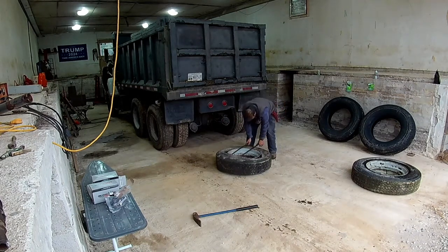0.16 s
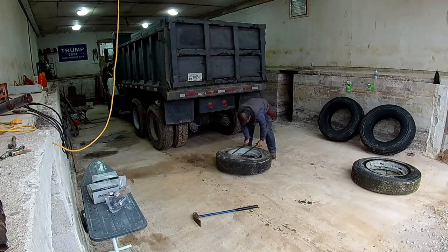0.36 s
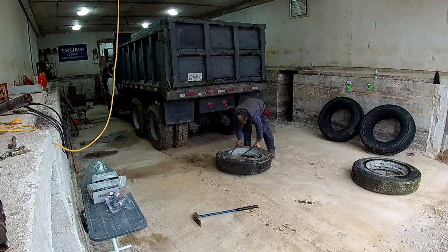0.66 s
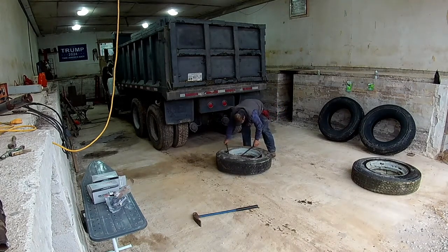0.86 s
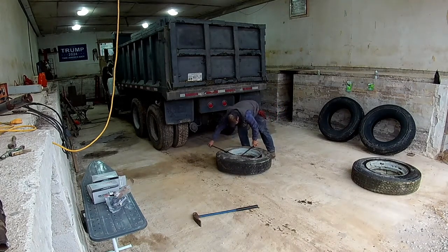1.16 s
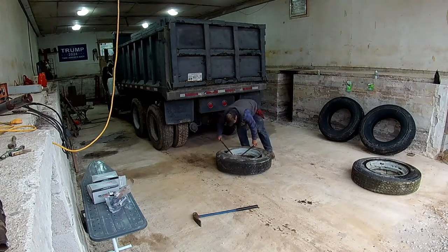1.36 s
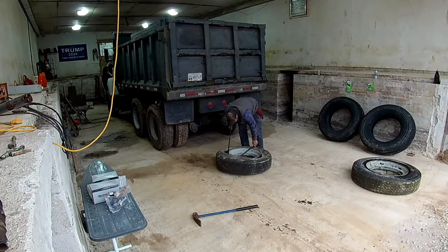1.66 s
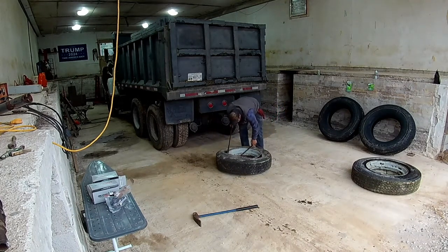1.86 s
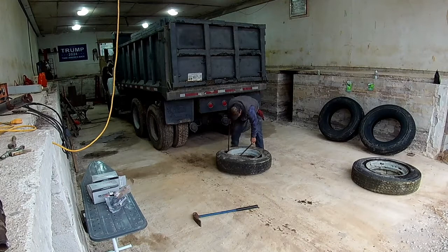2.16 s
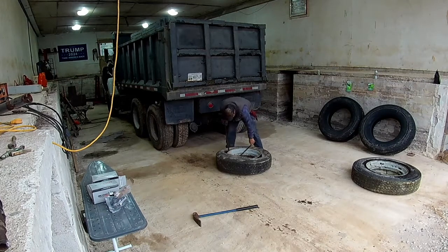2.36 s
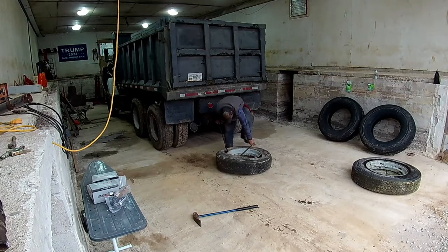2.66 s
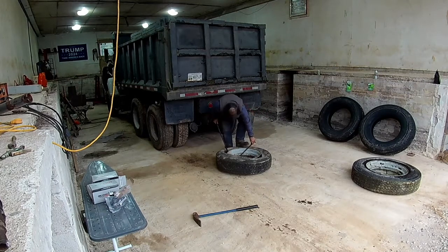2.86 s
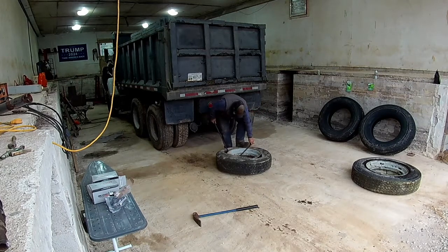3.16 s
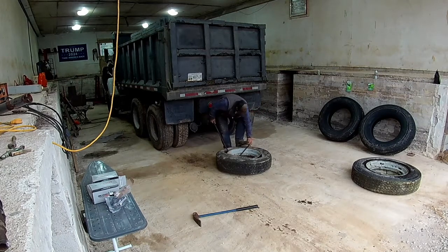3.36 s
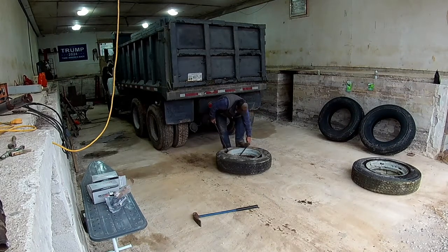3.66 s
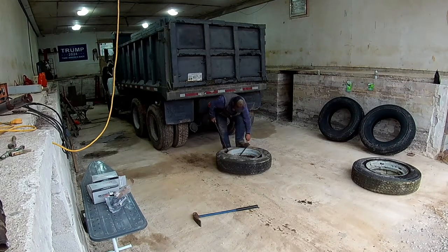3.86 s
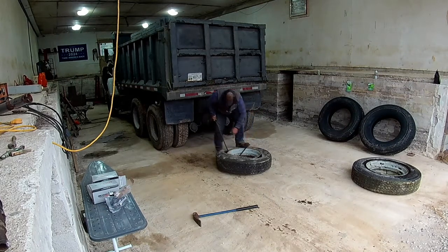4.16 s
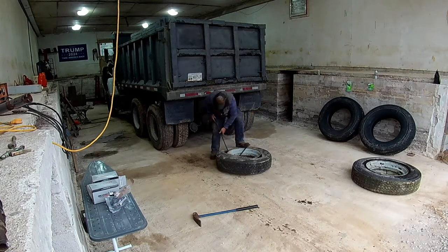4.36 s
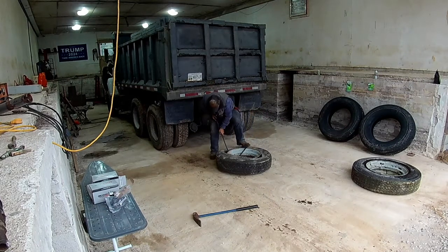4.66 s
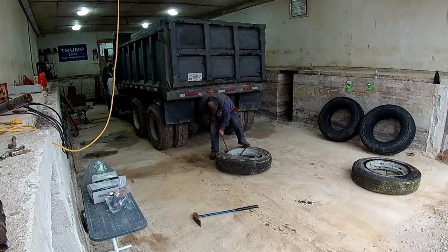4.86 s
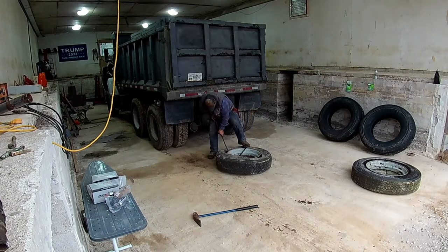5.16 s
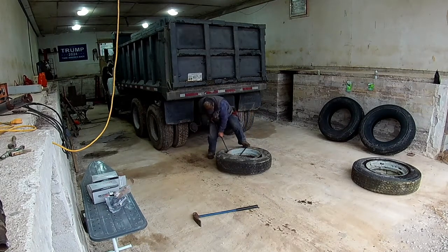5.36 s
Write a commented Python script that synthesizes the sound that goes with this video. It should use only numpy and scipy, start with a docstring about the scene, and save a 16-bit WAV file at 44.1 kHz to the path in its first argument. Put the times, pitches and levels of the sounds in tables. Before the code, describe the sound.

Iron bars pry at a heavy truck tire on a steel wheel, with dull thuds, scrapes and hard ringing clanks echoing in a concrete bay.

```python
"""Steel tire irons lever a truck tire over its wheel rim, a few metres away in a concrete workshop bay.
Dull tire thuds open; a scrape leads to a hard clank, and twice the tip snaps off the edge and rings the rim.
Rubbing and brief rings of the hand-held iron follow, then a clank as a low hum swells and sinks again.
A last scrape ends in a clank, a booming thud and a third snap. Struck modes make the ringing, random
stick-slip clicks the scraping; the bay echoes the blows, and filtered noise rumbles steadily below."""
import sys
import numpy as np
from scipy import signal
from scipy.fft import rfft, irfft
from scipy.io import wavfile
from scipy.ndimage import uniform_filter1d

SR = 44100
rng = np.random.default_rng(int(sys.argv[2]) if len(sys.argv) > 2 else 0)


def wav_record(signal):
    """Record a signal, one row per channel, as 16-bit PCM in the file named by sys.argv[1]."""
    frames = np.transpose(np.atleast_2d(signal))
    bounded = np.clip(frames, -1, 1)
    # unit amplitude maps onto the largest positive 16-bit level
    quanta = np.round(bounded * 32767).astype(np.int16)
    wavfile.write(sys.argv[1], SR, quanta)


N = 243873
TIME = np.arange(N) / SR
SECOND = TIME[:SR]

# iron knocks on the wheel: start_s, clatter_db, contact_cutoff_hz, grit_db, touches (count),
# rebound_db (change per touch), wheel_ring_db, place struck (0-2)
KNOCK_EVENTS = [(0.167, -14.5, 833, -38.5, 2, -0.5, -22, 1), (0.664, -3, 2700, -35.5, 4, -1.5, 0, 0),
                (1.054, -19.5, 1300, -33, 1, 3, -14, 0), (1.260, -19, 1440, -45, 2, 2, -14.5, 1),
                (1.545, -13, 1580, -25.5, 2, 2.5, 1.5, 2), (3.578, -6.5, 1580, -43, 2, 1, 1, 1),
                (4.313, -23.5, 1300, -42, 2, -10, -20, 1), (5.335, -5, 920, -25.5, 2, -4, -18.5, 1)]
# colour of a hard iron blow: frequency_hz, relative_level_db (per Hz)
CRACK_SPECTRUM = [(150, -19), (280, -6.5), (380, -2), (540, 1), (700, -2), (1050, 6), (1500, -3.5),
                  (2150, -3), (2900, -14.5), (3850, -12.5), (5000, -56.5), (7000, -48.5), (15000, -53)]
# colour of iron grating on steel: frequency_hz, relative_level_db (per Hz)
GRIT_SPECTRUM = [(900, -8), (1400, 10.5), (2000, 0), (2800, -2), (3600, -3), (4600, -7), (5500, -16),
                 (6500, -25), (9000, -34.5), (15000, -53.5)]


def from_db(db):
    """Decibels to gain."""
    return 10 ** (np.asarray(db) / 20)


def unit(x):
    """Scale to an energy of one."""
    return x / np.sqrt(np.sum(x ** 2) + 1e-20)


def at_hz(points, hz):
    """Read a table along log frequency."""
    f, value = np.transpose(points)
    return np.interp(np.log(np.maximum(hz, 1)), np.log(f), value)


def add(out, s, sound):
    """Mix a sound in at a given time."""
    i = int(np.clip(round(s * SR), 0, N - 1))
    out[i:i + len(sound)] += sound[:N - i]


def through(x, response):
    """Pass a sound through an impulse response."""
    return signal.fftconvolve(x, response)[:N]


def pulse(spectrum, size=8192):
    """The most compact causal pulse with this spectrum (minimum phase); energy one."""
    gain = from_db(at_hz(spectrum, np.fft.rfftfreq(size, 1 / SR)))
    cepstrum = irfft(np.log(gain))
    # folding the cepstrum forward in time gives the minimum phase
    cepstrum[1:size // 2] *= 2
    cepstrum[size // 2 + 1:] = 0
    return unit(irfft(np.exp(rfft(cepstrum))))


def fade(t60):
    """One second of exponential decay that falls 60 dB in t60 seconds."""
    return np.exp(-np.log(1000) * SECOND / max(t60, 1e-3))


def ring(modes):
    """Struck modes, each dying at its own rate."""
    out = np.zeros(SR)
    for hz, db, t60 in modes:
        tone = unit(np.sin(2 * np.pi * hz * SECOND) * fade(t60))
        out += from_db(db) * rng.choice([-1, 1]) * tone
    return out


def slips(per_s, spread_db):
    """Stick-slip: random clicks of uneven size; rms one."""
    sizes = from_db(spread_db * np.minimum(rng.exponential(1, N), 4)) * rng.choice([-1, 1], N)
    clicks = sizes * (rng.random(N) < per_s / SR)
    return unit(clicks) * np.sqrt(N)


def knocks(hiss_db, slip_t60):
    """The iron clatters on the wheel, duller on each rebound, and the slipping tip grates."""
    first_gap_s, gap_stretch = .014, 1.4  # each further gap is longer by the stretch
    dulling = 0.72  # factor per touch on the contact cut-off, and on the grating's level
    clatter, hiss = np.zeros(N), np.zeros(N)
    crack, grit = pulse(CRACK_SPECTRUM), pulse(GRIT_SPECTRUM)
    for s, db, contact_hz, grit_db, touches, rebound_db, _, _ in KNOCK_EVENTS:
        for k in range(touches):
            force = from_db(rebound_db * k)
            contact = signal.butter(2, contact_hz * dulling ** k, fs=SR, output="sos")
            add(clatter, s, force * from_db(db) * signal.sosfilt(contact, crack))

            dying_slips = slips(per_s=2500, spread_db=4)[:SR] * fade(slip_t60)
            grating = unit(through(dying_slips, grit))
            add(clatter, s, force * dulling ** k * from_db(grit_db) * grating)

            # very faint short hiss added to each knock
            short_noise = unit(rng.standard_normal(SR) * (fade(.25) - fade(.04)))
            add(hiss, s, force * from_db(db + hiss_db) * short_noise)
            s += first_gap_s * gap_stretch ** k
    return clatter, hiss


def steel(blows, modes, waver, first_swell, size=36):
    """Ringing steel: the place struck decides which modes speak; overlapping echoes make each tone waver."""
    # decay of the ring heard in the bay: frequency_hz, t60_s
    steel_t60 = [(300, .8), (1100, .85), (2400, .8), (5000, .68), (6000, .7), (7000, .52), (9400, .25)]
    out = np.zeros(N)
    for s, db, place in blows:
        for hz, *place_db in modes:
            drift = rng.standard_normal(size) + 1j * rng.standard_normal(size)
            echoes = np.interp(SECOND * (size - 1), np.arange(size), drift)
            carrier = np.exp(2j * np.pi * (hz * SECOND + rng.random()))
            tone = np.real((1 + waver * echoes) * carrier)
            # the tire soon damps the steel, and the bay carries the tone on
            decay = fade(at_hz(steel_t60, hz)) + first_swell * fade(.3)
            onset = 1 - fade(.008)
            add(out, s, from_db(db + place_db[place]) * unit(tone * decay * onset))
    return out


def wheel_ring():
    """Every knock sets the wheel's modes ringing."""
    # wheel modes: frequency_hz, then level_db when struck at place 0, 1, 2
    wheel_modes = [(306, -18, -21, -15), (457, -17, -34, -17), (559, -23, -13, -33), (579, -13, -21, -24),
                   (703, -19, -20, -41), (750, -33, -15, -23), (775, -24, -18, -31), (885, -34, -16, -40),
                   (942, -13, -33, -28), (962, -16, -18, -30), (976, -6, -33, -23), (1007, -25, -21, -16),
                   (1022, -14, -19, -17), (1052, -24, -36, -16), (1071, -16, -38, -21),
                   (1100, -24, -14, -36), (1125, -10, -24, -33), (1150, -9, -27, -36),
                   (1178, -13, -26, -23), (1305, -25, -41, -20), (1394, -15, -34, -36),
                   (1444, -18, -23, -38), (1497, -39, -45, -22), (1602, -19, -32, -49),
                   (1641, -15, -28, -46), (1678, -35, -20, -31), (1773, -20, -27, -25),
                   (2054, -16, -40, -32), (2130, -18, -28, -36), (2213, -23, -30, -40)]
    blows = [(s, ring_db, place) for s, *_, ring_db, place in KNOCK_EVENTS]
    return steel(blows, wheel_modes, waver=0.86, first_swell=0.99)


def rim_snaps():
    """The tip snaps off the rim's free edge and rings its higher modes."""
    # snaps: start_s, level_db, place on the edge (0-2)
    snap_events = [(1.063, 0, 0), (1.552, 2, 1), (5.34, 0.5, 2)]
    # modes of the free edge: frequency_hz, then level_db when struck at place 0, 1, 2
    rim_modes = [(2375, -27, -29, -44), (2595, -50, -29, -46), (2666, -60, -29, -50), (2734, -39, -42, -39),
                 (2875, -50, -30, -48), (3114, -52, -32, -50), (3359, -66, -32, -48), (3439, -46, -32, -39),
                 (3616, -41, -41, -35), (3958, -25, -35, -44), (4077, -41, -39, -50), (4239, -67, -32, -44),
                 (4410, -70, -35, -40), (4674, -46, -39, -40), (4719, -59, -34, -46),
                 (4886, -25.5, -34, -56), (5176, -58, -36, -60), (5530, -44, -50, -47),
                 (5715, -42, -43, -52), (5893, -60, -35, -65), (5938, -70, -38, -65), (7012, -40, -42, -62),
                 (7606, -70, -52, -65), (9400, -56, -58, -70)]
    return steel(snap_events, rim_modes, waver=.9, first_swell=1.8)


def tire():
    """The rubber gives a dull slap, and the carcass booms on in the modes nearest the pitch of the push."""
    # thuds: start_s, slap_db, boom_db, push_hz
    thuds = [(0.073, -18, -23, 156), (0.101, -20.5, -15, 102), (0.168, -6, -24, 135),
             (0.189, -13, -4, 122.4), (0.667, -7.5, -6, 133), (1.0, -14, -23, 110),
             (1.042, -10, -6.5, 121.5), (1.547, -3.5, -5.5, 142), (1.583, -13, -2.5, 191),
             (2.284, -23, -24, 108), (2.749, -23, -14.5, 99), (2.886, -21.5, -18, 150),
             (3.584, -14.5, -8, 143.5), (4.307, -16, -32, 183), (5.333, -8, 2.5, 106)]
    # carcass modes: frequency_hz, t60_s
    carcass = [(102, .45), (135, .5), (176, .42)]
    # colour of the rubber slap: frequency_hz, relative_level_db (per Hz)
    rubber = [(30, -32.5), (60, -4), (90, 0.5), (125, 1), (185, 4), (240, -1), (310, 0), (380, -10),
              (490, -7), (900, -26), (3000, -67.5)]
    fall_db_per_octave = 25  # modes answer less the further they lie from the push
    slap, boom, push = np.zeros(N), np.zeros(N), pulse(rubber)
    for s, slap_db, boom_db, push_hz in thuds:
        add(slap, s, from_db(slap_db) * push)
        for hz, t60 in carcass:
            db = boom_db - fall_db_per_octave * abs(np.log2(hz / push_hz))
            envelope = fade(t60) - fade(0.016)  # soft onset
            add(boom, s, from_db(db) * unit(np.sin(2 * np.pi * hz * SECOND) * envelope))
    return slap, boom


def iron_rings(crack_db, contact_hz):
    """The hand-held iron rings briefly, from a knock or a tap on the other iron; a low-pass blunts it."""
    # brief rings: start_s, level_db
    ring_events = [(1.056, -22), (1.274, -35), (2.4243, -14), (2.438, -23.5), (3.183, -28.5)]
    # modes of the iron, damped by the hands: frequency_hz, level_db, t60_s
    iron = [(570, 3, .06), (857, 1, .05), (1057, 2, .05), (1368, -2, .12), (1497, -3, .17), (2200, -8, .05),
            (2540, -8, .04), (2780, -10, .04), (3165, -17, .03), (3450, -16, .03), (4490, -15, .012)]
    out = np.zeros(N)
    for s, db in ring_events:
        add(out, s, from_db(db) * unit(ring(iron)))
        add(out, s, from_db(db + crack_db) * pulse(CRACK_SPECTRUM))
    blunt = signal.butter(4, contact_hz, fs=SR, output="sos")
    return signal.sosfilt(blunt, out + 1e-18)


def stroke(start, length):
    """Pressure on the iron builds through a stroke and lets go at its end."""
    swell_power, release_s = 2.13, 0.044  # release_s is the time constant of the letting go
    progress = np.clip((TIME - start) / max(length, 1e-3), 0, 1)
    release = np.exp(-np.maximum(TIME - start - length, 0) / release_s)
    return progress ** swell_power * release


def sliding():
    """Iron slides under the bead: fine slips on steel, coarser ones on rubber; each stroke drives both."""
    # strokes: start_s, length_s, steel_scrape_db, rubber_rub_db
    slides = [(0, 0.003, -64.5, -55), (0.627, 0.034, -57.5, -58), (0.975, .075, -54, -60),
              (1.333, 0.12, -64, -55.5), (1.473, 0.084, -47, -44.5), (2.214, 0.15, -72, -57.5),
              (2.798, 0.1, -82, -58), (4.028, 0.12, -72.5, -67), (4.256, 0.086, -83, -52.5),
              (4.8, .16, -73, -73), (5.251, 0.1, -57.5, -48)]
    # colour of the rub on rubber: frequency_hz, relative_level_db (per Hz)
    rub = [(100, -12.5), (270, 4), (550, 4), (750, -2.5), (1100, -0.5), (1700, -17.5), (3000, -30.5),
           (6000, -46)]
    # between strokes the wedged iron still creeps
    on_steel, on_rubber = from_db(-82), from_db(-72.5)
    for start, length, steel_db, rubber_db in slides:
        pressure = stroke(start, length)
        on_steel = np.hypot(on_steel, from_db(steel_db) * pressure)
        on_rubber = np.hypot(on_rubber, from_db(rubber_db) * pressure)
    scrape = through(slips(per_s=3000, spread_db=2), pulse(GRIT_SPECTRUM))
    rubbing = through(slips(per_s=800, spread_db=2.5), pulse(rub))
    return on_steel * scrape + on_rubber * rubbing


def even(x, size=41):
    """Take the broad colour out of a one-second response and keep its fine ripple; energy one."""
    spectrum = rfft(x, 2 * SR)
    broad_power = uniform_filter1d(np.abs(spectrum) ** 2, 2 * size)
    return unit(irfft(spectrum / np.sqrt(broad_power + 1e-9))[:SR])


def bay(direct_db, late_db, early_t60, gap_s):
    """Direct sound, a cluster of echoes off floor, truck and walls, then a tail with its own decay per band."""
    # decay of the bay: frequency_hz, t60_s
    bay_t60 = [(100, 0.9), (400, 1), (1100, 1.17), (2200, 1), (4500, 0.72), (8000, 0.99), (15000, 0.44)]
    edges = np.geomspace(40, 17000, 14)
    white, tail = rng.standard_normal((2, SR)), np.zeros(SR)
    for k, (low, high) in enumerate(zip(edges, edges[1:])):
        band_filter = signal.butter(2, [low, high], "band", fs=SR, output="sos")
        band = signal.sosfilt(band_filter, white[k % 2])  # neighbouring bands use separate noise
        tail += band * fade(at_hz(bay_t60, np.sqrt(low * high)))
    build_up = 1 - np.exp(-(SECOND / gap_s) ** 2)
    early = unit(slips(per_s=2000, spread_db=1.5)[:SR] * fade(early_t60) * build_up)
    early[0] += from_db(direct_db)
    late = from_db(late_db) * unit(tail * build_up)
    return even(even(early) + late)  # bare concrete favours no pitch


def background():
    """Steady rumble of the building, shaped from noise, and a wavering low hum that swells and fades."""
    # colour of the rumble: frequency_hz, relative_level_db (per Hz)
    rumble_spectrum = [(20, -10.5), (45, -6), (75, -0.5), (130, -0.5), (220, -8.5), (400, -19),
                       (1200, -26.5), (2000, -32.5), (4000, -46.5), (6000, -49.5), (9000, -53.5),
                       (15000, -59.5)]
    # course of the hum: time_s, level_db
    hum_level = [(0, -76), (3.55, -65), (3.75, -59), (4.5, -59), (4.7, -78), (5.53, -73)]
    rumble_db, hum_hz, waver_hz = -58.5, 142.5, 1.5
    gain = from_db(at_hz(rumble_spectrum, np.fft.rfftfreq(N, 1 / SR)))
    rumble = unit(irfft(rfft(rng.standard_normal(N)) * gain, N)) * np.sqrt(N)

    waver = np.interp(TIME, np.linspace(0, TIME[-1], 30), rng.standard_normal(30))
    hum = np.sqrt(2) * np.sin(2 * np.pi * np.cumsum(hum_hz + waver_hz * waver) / SR)
    hum_db = np.interp(TIME, *np.transpose(hum_level))
    return from_db(rumble_db) * rumble + from_db(hum_db) * hum


def scene():
    """All the work on the wheel, heard in the bay; short sounds come mostly as echoes."""
    room = bay(direct_db=-6.5, late_db=-4, early_t60=0.16, gap_s=0.0016)
    clatter, hiss = knocks(hiss_db=-45.5, slip_t60=0.068)
    slap, boom = tire()
    short = clatter + iron_rings(crack_db=-8.5, contact_hz=4670) + sliding() + slap
    echoing = through(from_db(0.5) * short + from_db(-21.5) * boom, room)
    # the steel's decay already holds the bay; most of the boom comes direct
    return (echoing + wheel_ring() + rim_snaps() + hiss + boom + background())[None]


def record(dry):
    """An elliptic low-pass cuts the top steeply."""
    cutoff_hz, ripple_db, stop_db = 15700, .1, 80
    top_cut = signal.ellip(10, ripple_db, stop_db, cutoff_hz, fs=SR, output="sos")
    return signal.sosfilt(top_cut, dry)


dry = scene()
out = record(dry)
wav_record(out)
```